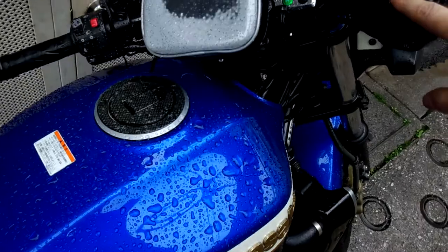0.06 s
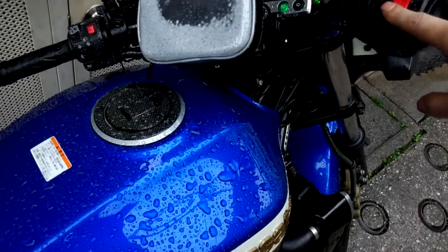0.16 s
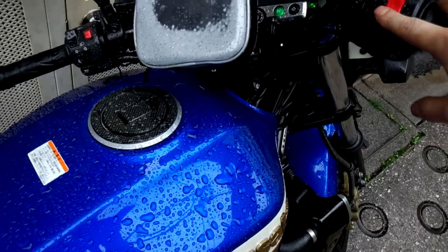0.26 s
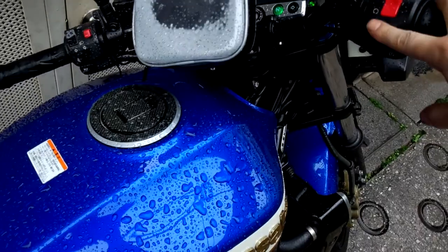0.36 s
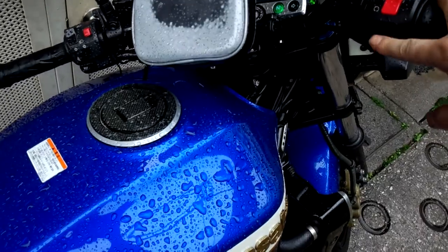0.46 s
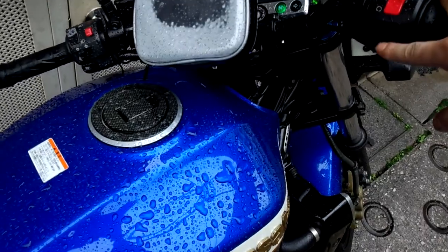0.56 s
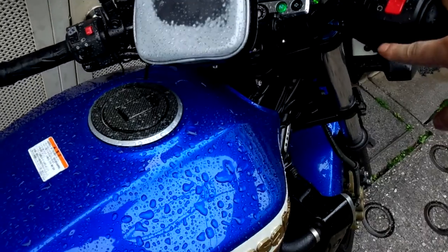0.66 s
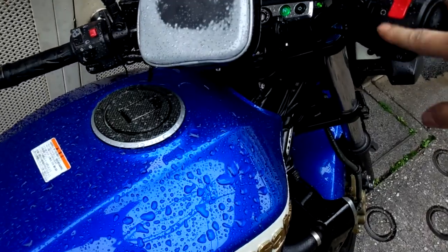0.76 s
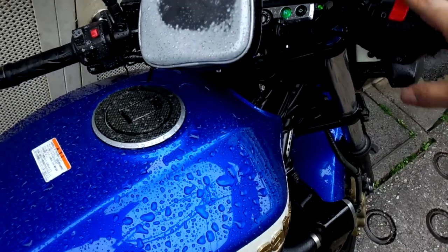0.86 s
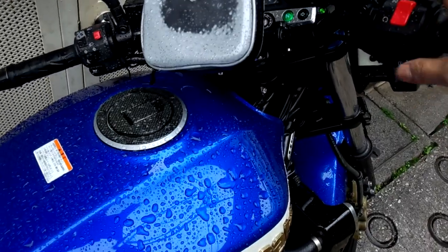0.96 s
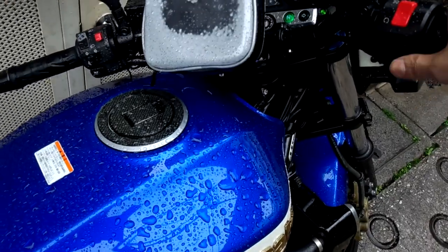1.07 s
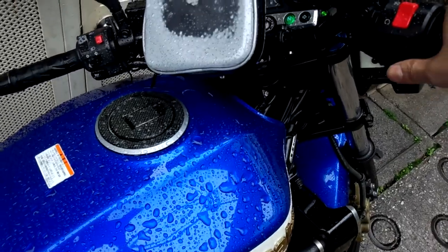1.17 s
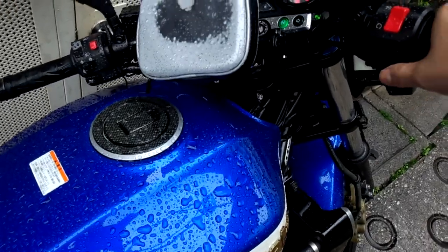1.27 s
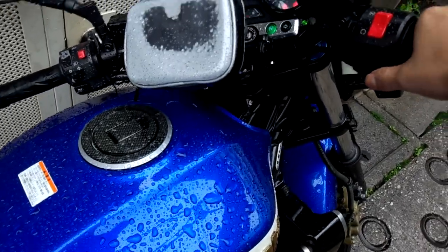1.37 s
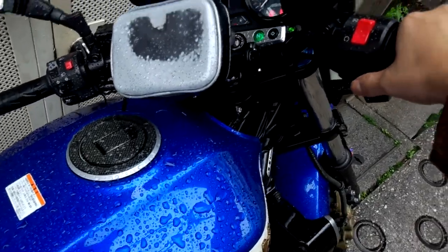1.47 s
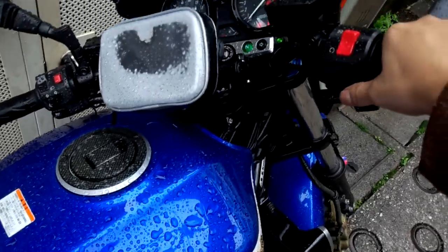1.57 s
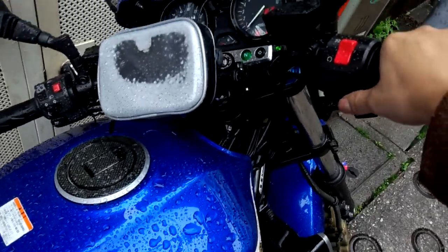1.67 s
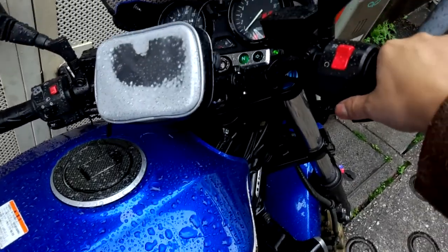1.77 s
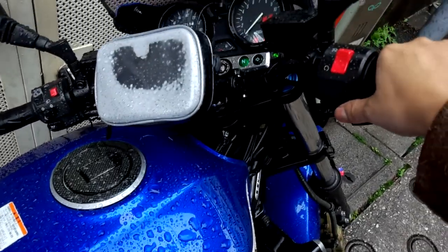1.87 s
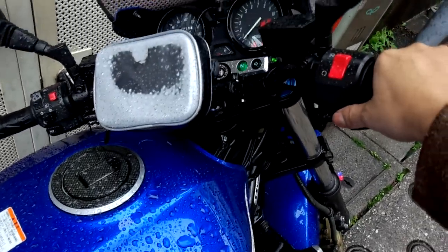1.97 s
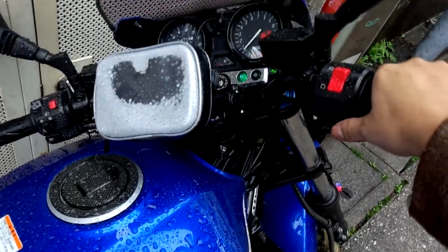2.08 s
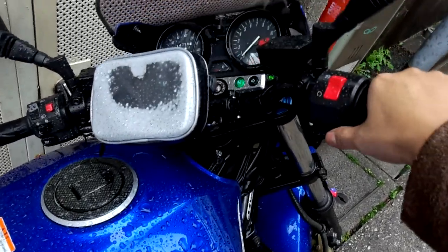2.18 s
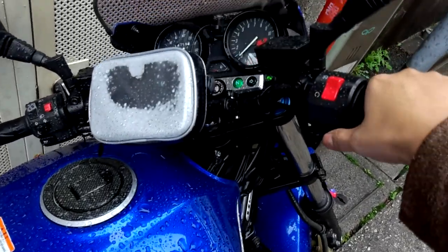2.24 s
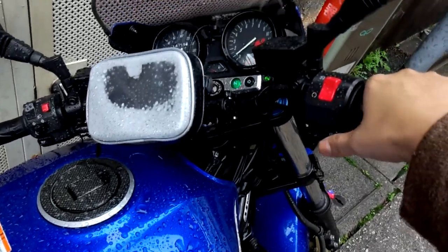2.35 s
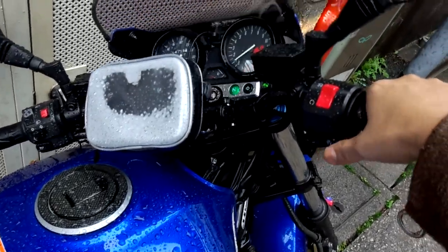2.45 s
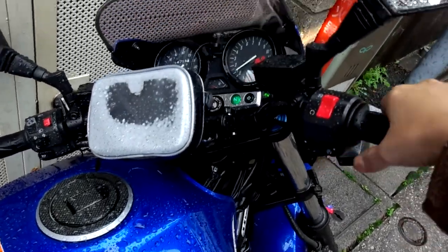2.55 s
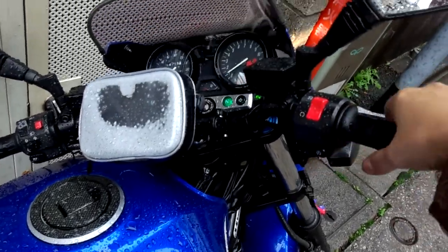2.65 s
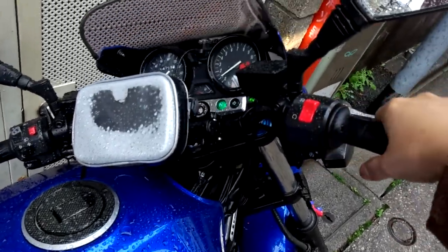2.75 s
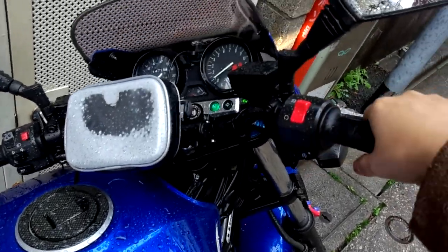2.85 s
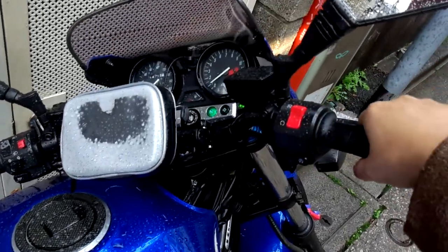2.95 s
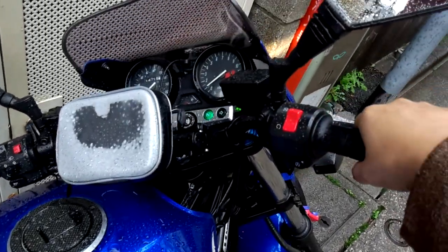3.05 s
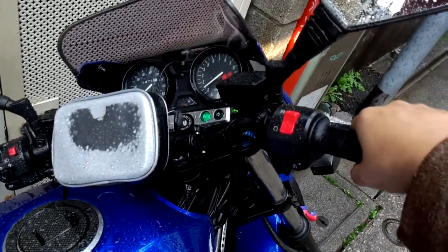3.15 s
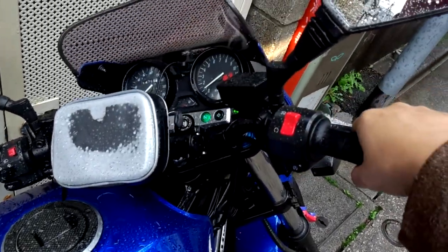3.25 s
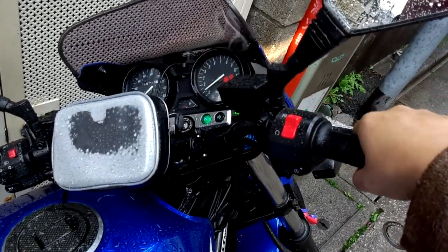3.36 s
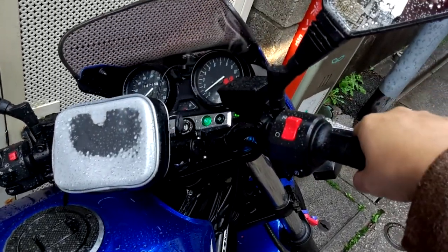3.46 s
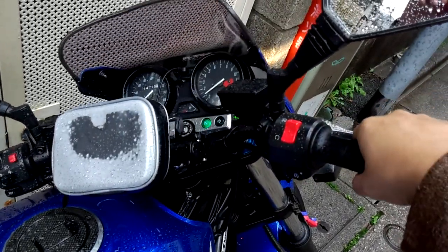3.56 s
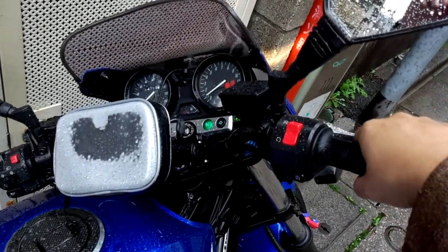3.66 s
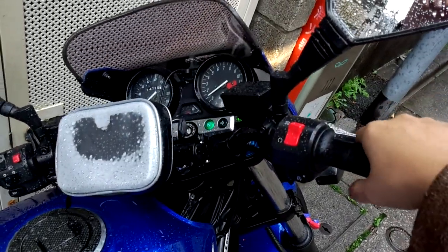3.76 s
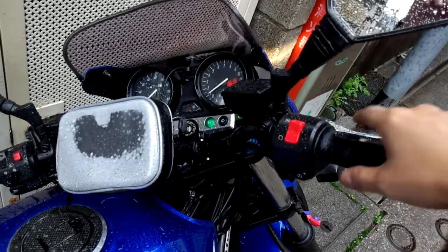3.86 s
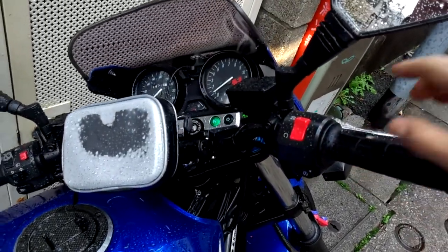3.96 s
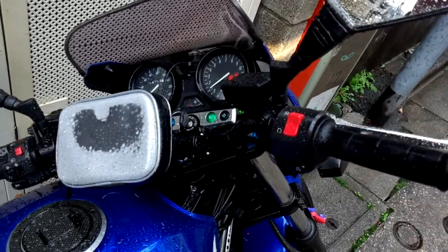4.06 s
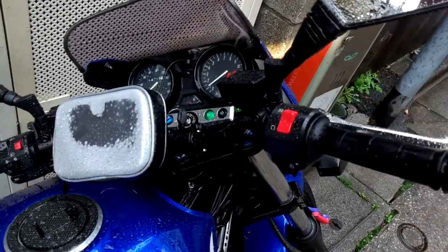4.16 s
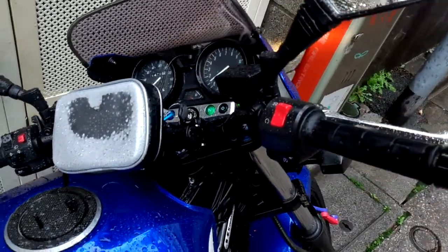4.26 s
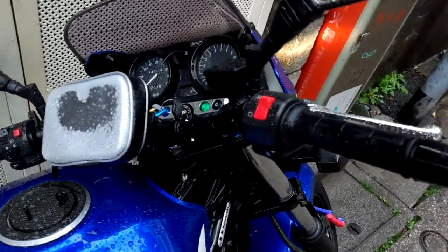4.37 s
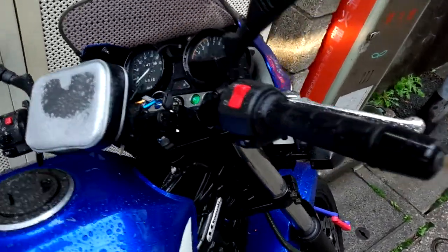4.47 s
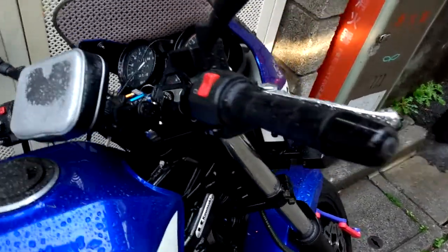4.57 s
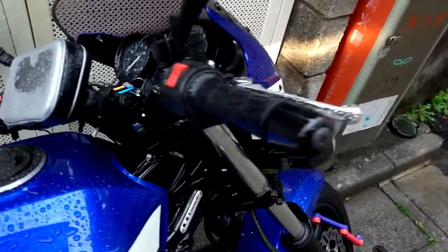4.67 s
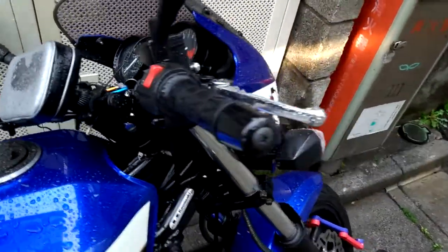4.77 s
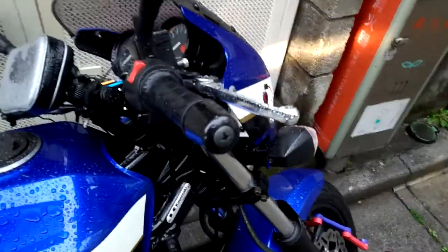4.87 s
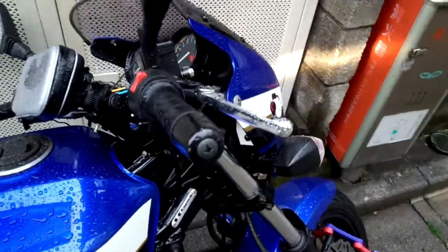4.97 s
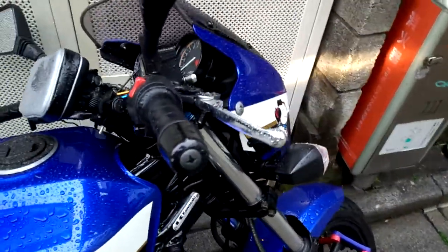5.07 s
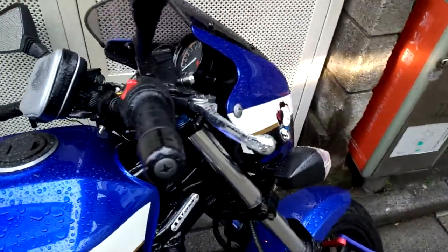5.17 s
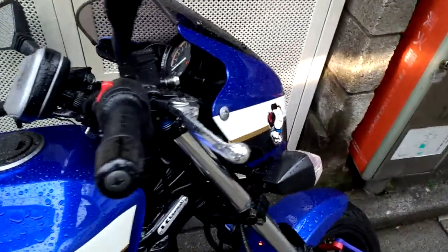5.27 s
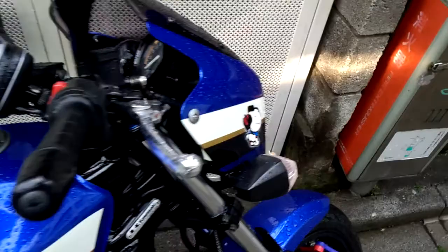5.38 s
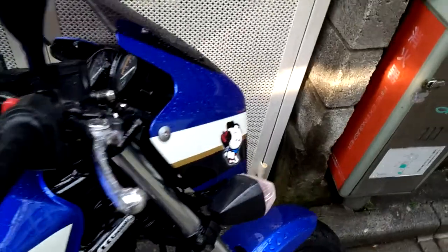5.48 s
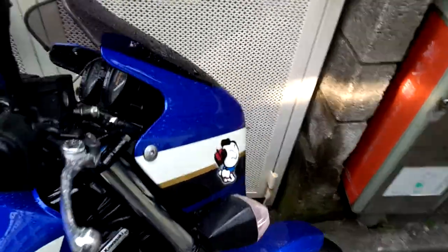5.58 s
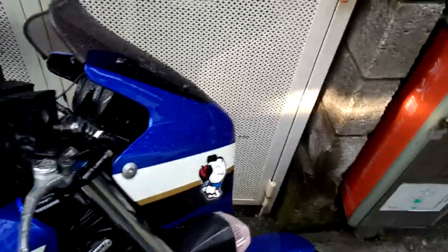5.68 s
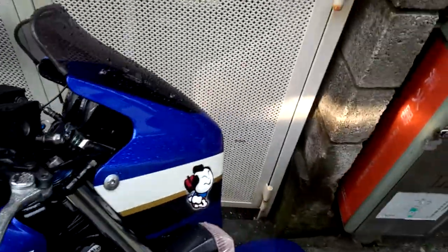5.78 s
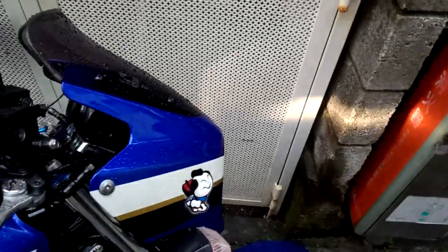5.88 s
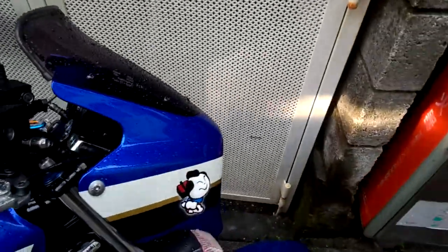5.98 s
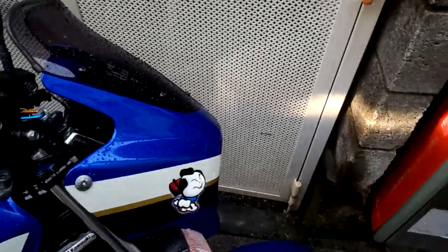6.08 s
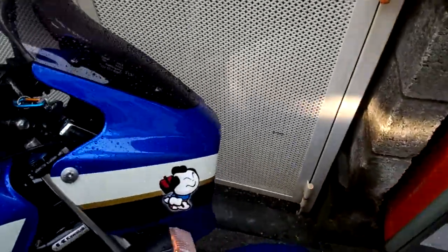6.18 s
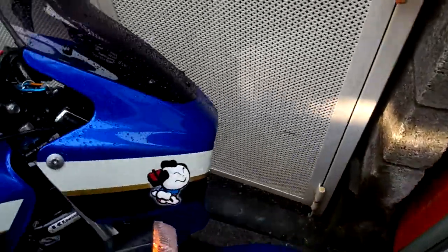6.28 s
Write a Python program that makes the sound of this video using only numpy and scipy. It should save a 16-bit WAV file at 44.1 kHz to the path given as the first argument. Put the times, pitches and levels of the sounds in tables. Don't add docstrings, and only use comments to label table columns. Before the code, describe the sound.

After sparse clicks and faint sleeve rustle, a cold motorcycle cranks with a short gritty squeal, fires, and settles into an uneven, throbbing close-up idle.

```python
import sys
import numpy as np
from scipy import signal
from scipy.fft import rfft, irfft
from scipy.io import wavfile
from scipy.ndimage import uniform_filter1d

SR = 44100
rng = np.random.default_rng(int(sys.argv[2]) if len(sys.argv) > 2 else 0)


def file_out(sig):
    cols = np.atleast_2d(sig).T
    lim = np.clip(cols, -1, 1)
    pcm = np.round(lim * 32767).astype(np.int16)
    wavfile.write(sys.argv[1], SR, pcm)


def elevation(decibels):
    levels = np.asarray(decibels, float)
    return 10 ** (levels / 20)


N = 279153
HEADROOM_DB = 9.5

# (frequency [Hz], level [dB per Hz])
YARD_COLOUR = [(12, -27), (20, 0), (70, 0.5), (148, -8), (185, -11), (219, -11.5), (274, -11.5), (519, -22),
               (667, -21.5), (1580, -31), (6720, -38), (10200, -40.5), (15500, -39.5)]
# (time [s], level [dB])
RUSTLE = [
    (0, -55),
    (.09, -57),
    (.105, -38.5),
    (.24, -50),
    (.36, -62),
    (.9, -63),
    (1.3, -58.5),
    (1.5, -58),
    (1.54, -75),
]
# (time [s], peak level [dB], centre [Hz], width [Hz], time to fall 60 dB [s])
CLICKS = [(0.088, -5, 6300, 2400, 0.017), (0.0888, -8, 4740, 1190, 0.025),
          (0.521, -35.5, 8000, 4000, 0.011), (.9575, -30, 9500, 4000, .006), (1.003, -40, 5000, 5000, .01),
          (1.0425, -38.5, 8440, 3000, .006), (1.067, -19.5, 8050, 9500, 0.0062),
          (1.082, -31, 5000, 4000, .005), (1.157, -31, 10500, 6000, .02), (1.167, -32, 10500, 6000, 0.031),
          (1.547, -15, 7100, 8900, 0.017), (0.0863, -19, 6000, 6000, 0.03), (0.0797, -25, 7500, 4000, .04),
          (5.474, -9.5, 5240, 6050, 0.003), (5.495, -28, 3700, 3000, 0.0074)]
# (frequency [Hz], level [dB], time to fall 60 dB [s])
SWITCH_HOUSING = [(1016, -4, 0.054), (1255, 4.5, 0.035), (2000, 4, 0.011), (4100, -10, 0.056),
                  (5950, -26, 0.03), (8300, -33, .02)]
# (time of peak [s], rise [s], level [dB], treble against it [dB])
GRIND = [
    (1.551, 0.0038, -26.5, -1),
    (1.615, 0.058, -22.5, 2),
    (1.664, .006, -23.5, 4),
    (1.747, 0.073, -29, -5.5),
    (1.814, 0.006, -28.5, 6),
    (1.907, 0.015, -30.5, 8.5),
]
# (frequency [Hz], width [Hz], level [dB])
CASING = [(1290, 120, 20), (1610, 76, -1), (2080, 49, 0), (3180, 29, -24.5), (3620, 42, -10),
          (4410, 53, -36)]
# (frequency [Hz], level [dB per Hz])
CASING_TREBLE = [(2350, -3.5), (4000, -7), (4640, -8.5), (8170, 4.5), (8700, 9.5), (9570, 0.5),
                 (10900, 5.5), (12400, -7), (15500, -54)]
# (start [s], length [s], first pitch [Hz], settled pitch [Hz], level [dB])
SQUEALS = [
    (1.559, 0.0183, 1280, 1257, -16),
    (1.658, .06, 1420, 1242, -16),
    (1.812, .027, 1437, 1250, -19),
    (1.901, .019, 1390, 1530, -21.5),
]
# (start [s], length [s], first pitch [Hz], settled pitch [Hz], level [dB])
CHIRPS = [(1.578, 0.0171, 1500, 1680, -21), (1.603, 0.03, 2050, 2230, -21),
          (1.829, 0.019, 2160, 2140, -29.5), (1.812, 0.018, 2160, 2170, -27), (1.6, 0.037, 1160, 1120, -27),
          (1.603, .03, 1640, 1620, -27), (1.583, 0.0121, 800, 530, -30), (1.733, 0.0302, 3800, 3760, -35),
          (1.963, .026, 3770, 3780, -38)]
# (multiple of its pitch [1], level [dB])
OVERTONES = [(1, 0), (3, -17), (5, -18), (7, -20)]
# (time [s], level [dB])
HEAVE = [
    (1.7, -48),
    (1.716, -50),
    (1.752, -32.5),
    (1.8, -37.5),
    (1.878, -42),
    (1.896, -44),
    (1.97, -10),
]
# (first firing [s], last firing [s], blow [dB], suck-back of the first miss [dB])
RUNS = [(1.986, 2.014, -1, 1), (2.088, 2.088, -6, -8), (2.206, 2.257, -3.5, 6), (2.301, 2.324, -1, -3),
        (2.391, 2.441, 2.5, -3), (2.583, 2.688, -3, 0.5), (2.821, 2.896, 0.5, 1), (3.03, 3.132, -1.5, -5.5),
        (3.177, 3.2, 5.5, -6), (3.267, 3.311, -0.5, -2.5), (3.47, 3.515, 2, -9), (3.674, 3.722, 1, -8),
        (3.875, 3.949, -1.5, 4), (4.09, 4.183, -1, 4), (4.285, 4.358, -3.5, -13), (4.462, 4.56, -6.5, 0),
        (4.734, 4.784, 0.5, -4), (4.894, 4.995, -1.5, -33.5), (5.111, 5.211, -4, -27),
        (5.321, 5.422, -5, 2.5), (5.566, 5.641, -2, 3), (5.751, 5.85, -3.5, -1), (5.984, 6.057, -1.5, 4),
        (6.202, 6.274, -3.5, -4)]
# (frequency [Hz], level [dB], time to fall 60 dB [s])
PIPE = [(34.32, 2.5, 0.2375), (78.8, -1.5, 0.41), (107.2, -0.5, 0.43), (154.3, -12, 0.19),
        (196.2, -20.5, 0.242), (229, -24.5, 0.076), (286.7, -23, 0.288)]
# (frequency [Hz], level [dB], time to fall 60 dB [s])
PIPE_FRONT = [(82.2, -5, .15), (161.7, -4, 0.15), (201.2, -12, 0.3)]
# (frequency [Hz], width [Hz], level [dB])
BURBLE = [(151.3, 33, -0.5), (187.55, 14, 2.5), (233.8, 26, 0.5), (266.1, 43.7, -1), (304, 19, -5),
          (406.3, 27.6, -13)]
# (frequency [Hz], level [dB per Hz])
ROAR = [(76, 2), (130, -4.5), (343, -4.5), (460, -19.5), (753, -38.5), (900, -31.5), (1170, -51),
        (1980, -120)]
# (time [s], level [dB], share heard from the front [0-1])
GEAR = [(1.94, -30.5, 0), (2.11, -33.5, 0), (2.16, -31, 0), (2.45, -34.5, 0.3), (3.0, -35, 0.18),
        (3.58, -36, 0.25), (4.24, -35, 0.26), (4.33, -32, 0.45), (4.42, -33.5, .5), (4.62, -35.5, 0.75),
        (5.0, -34.5, 0.7), (5.33, -34, 0.82), (5.45, -37.5, 0.81), (5.65, -34.5, 0.9), (5.9, -35.5, 0.92),
        (6.33, -35.5, 0.74)]
# (frequency [Hz], level [dB per Hz])
GEAR_ABOVE = [(260, 0.5), (450, -10.5), (539, -0.5), (865, -8.0), (1280, -2.5), (2740, -11.5), (3890, -7.5),
              (5430, -9.5), (7270, -8), (8830, -1), (9870, -14.5), (12500, -10.5), (16200, -44),
              (22000, -120)][:-2] + [(13500, -22), (16000, -34)]
# (frequency [Hz], level [dB per Hz])
GEAR_FRONT = [(260, -6.5), (450, -0.5), (753, -8.0), (941, -2.5), (2420, 1.0), (2710, -4.5), (3780, -6),
              (4340, -6.5), (7170, -12.0), (8590, 2.5), (10000, -12.0), (12500, -11.5), (16200, -44),
              (22000, -120)][:-2] + [(13500, -25), (16000, -48)]
# (frequency [Hz], width [Hz], level from above [dB], level from the front [dB])
COVERS = [(949, 23.4, -83, -7.5), (1885, 127, -41, -22), (2470, 105, -53, -17.5), (3700, 198, -19, -12),
          (3972.3, 41.6, -11.5, -27.5)]
# (frequency [Hz], level [dB], time to fall 60 dB [s])
TAPPETS = [(934, -5.5, 0.0143), (1113, -1.5, 0.0229), (1317, -1, 0.0231), (1540, -3.5, 0.034),
           (1890, -1, 0.0098), (2480, -7.5, 0.0043), (3000, -4.5, 0.0086), (3900, 2, 0.0072)]
# (time [s], level [dB])
KNOCKS = [(2.761, -23.5), (2.972, -26), (3.383, -22), (3.586, -21), (3.792, -22), (4.0, -22),
          (4.231, -21.5), (4.403, -22), (4.505, -33)]


def evened(x):
    return x / np.sqrt(np.mean(x ** 2) + 1e-20)


def add(mix, start_s, sound):
    part = mix[round(start_s * SR):][:len(sound)]
    part += sound[:len(part)]


def columns(rows):
    times, *cols = np.transpose(rows)
    t = np.arange(round(times[0] * SR), min(round(times[-1] * SR), N)) / SR
    return t, [np.interp(t, times, c) for c in cols]


def coloured(x, points):
    f, db = np.transpose(points)
    hz = np.fft.rfftfreq(len(x), 1 / SR)
    curve_db = np.interp(np.log(hz + 1), np.log(f + 1), db)
    return evened(irfft(rfft(x) * elevation(curve_db), len(x)))


def resonate(x, hz, width):
    r = np.exp(-np.pi * width / SR)
    return 2 * signal.lfilter([1 - r], [1, -r * np.exp(2j * np.pi * hz / SR)], x).real


def resonate_twice(x, hz, width):
    return resonate(resonate(x, hz, width), hz, width)


def ring(modes, length_s):
    t = np.arange(round(length_s * SR)) / SR
    return sum(elevation(db - 60 * t / t60) * np.sin(2 * np.pi * hz * t) for hz, db, t60 in modes)


def wobble(smooth_s):
    size = max(round(smooth_s * SR), 1)
    once = uniform_filter1d(rng.standard_normal(N), size)
    return evened(uniform_filter1d(once, size))


def yard():
    level_db = -38.5 + 1.0 * wobble(0.0077)
    out = elevation(level_db) * coloured(rng.standard_normal(N), YARD_COLOUR)
    t, (rustle_db,) = columns(RUSTLE)
    cloth = resonate(resonate(rng.standard_normal(len(t)), 6300, 7600), 6380, 7500)
    add(out, t[0], elevation(rustle_db + 5.0) * evened(cloth))
    return out


def clicks(housing_db=-10):
    out, t = np.zeros(N), np.arange(1500) / SR
    for start, db, hz, width, t60 in CLICKS:
        burst = rng.standard_normal(len(t)) * elevation(-60 * t / max(t60, .001))
        snap = resonate_twice(burst, hz, width)
        level_db = db + HEADROOM_DB * (start > 1.5)
        add(out, start, elevation(level_db) * snap / abs(snap).max())
    add(out, CLICKS[0][0], elevation(housing_db) * ring(SWITCH_HOUSING, .06) / 3)
    return out


def grinding(teeth):
    casing = evened(sum(elevation(.5 * db) * resonate(teeth, hz, 2 * width) for hz, width, db in CASING))
    body = evened(0.56 * evened(resonate(teeth, 2200, 3440)) + casing)
    body = signal.lfilter(*signal.butter(2, 210, "high", fs=SR), body)
    treble = coloured(teeth, CASING_TREBLE)
    t = np.arange(N) / SR
    engage_s, release_s, let_go_s = 1.546, 1.94, 0.068
    meshed = np.interp(t, [engage_s - .002, engage_s, release_s, release_s + let_go_s], [0, 1, 1, 0])
    level_db, treble_db = np.full(N, -36.0), np.full(N, -46.0)
    rise_db, ease_db_per_s, ease_treble_db_per_s = 11.5, 171, 356.5
    for peak, rise, db, bright_db in GRIND:
        before_db = rise_db * np.maximum(peak - t, 0) / rise
        after_s = np.maximum(t - peak, 0)
        level_db = np.maximum(level_db, db - before_db - ease_db_per_s * after_s)
        treble_db = np.maximum(treble_db, db + bright_db - before_db - ease_treble_db_per_s * after_s)
    return meshed * (1.05 * elevation(level_db) * body + elevation(treble_db) * treble)


def squeal(length, first_hz, settled_hz, db, slip):
    t = np.arange(round(length * SR)) / SR
    wait, settle = .25, .33
    slide = np.sin(np.pi / 2 * np.clip((t / length - wait) / settle, 0, 1)) ** 2
    hz = first_hz + (settled_hz - first_hz) * slide
    turns = np.cumsum(hz * (1 + 0.0062 * slip[:len(t)])) / SR
    seated = np.exp(-((hz - 1245) / 60) ** 2)
    tone = sum(elevation(o_db) * seated ** (k > 1) * np.sin(2 * np.pi * k * turns) for k, o_db in OVERTONES)
    bite_s, bite_db, wilt_db = .012, 16, 4.5
    shape_db = -bite_db * np.maximum(1 - t / bite_s, 0)
    shape_db -= wilt_db * (np.maximum(t - bite_s, 0) / (length - bite_s)) ** 4
    return np.sqrt(2) * elevation(db + shape_db) * tone * signal.windows.tukey(len(t), .15)


def starter():
    teeth = rng.standard_normal(N) * elevation(1.35 * wobble(0.0038))
    slip = wobble(0.0044)
    out = grinding(teeth)
    for start, length, first_hz, settled_hz, db in SQUEALS + CHIRPS:
        add(out, start, squeal(length, first_hz, settled_hz, db, slip[round(start * SR):]))
    t, (heave_db,) = columns(HEAVE)
    heave = evened(resonate(resonate(resonate(teeth, 46, 30), 45, 30), 46, 30))[:len(t)]
    add(out, t[0], elevation(heave_db) * heave * signal.windows.tukey(len(t), .3))
    return elevation(HEADROOM_DB - 0.5) * out


def strokes():
    push, afterburn, valves = np.zeros((3, N))
    stroke_s, coast_s, hesitate_s = .0255, .0245, .005
    burble_lead_s, burble_s = .055, .13
    half_burn, flooded, late_suck_db = 0.26, 7.3, -6.5
    next_starts = [run[0] for run in RUNS[1:]] + [N / SR + 0.077]
    for (first, last, blow_db, suck_db), after in zip(RUNS, next_starts):
        burble_db = -26
        if last < 4.4 and after - first > .125:
            burble_db = -7.5
        if first == RUNS[0][0]:
            burble_db = -2.5
        fired = np.linspace(first, last, round((last - first) / stroke_s) + 1)
        misses = max(round((after - last) / coast_s), 1)
        missed = np.linspace(last + hesitate_s, after, misses + 1)[1:-1]
        suck = np.full(len(missed), half_burn) - flooded * elevation(2 * burble_db) * np.arange(len(missed)) / 2
        suck[-2:] = -elevation(late_suck_db)
        suck[:1] = -elevation(suck_db)
        sag = 0.19 * np.sin(np.linspace(0, np.pi, len(fired)) ** 2 / np.pi)
        size = np.r_[elevation(blow_db) * (1 - sag), suck]
        size = size + 0.128 * rng.standard_normal(len(size))
        for s, a in zip(np.r_[fired, missed], size):
            add(push, s, np.array([a]))
            add(valves, s, np.ones(1))
        add(afterburn, last - burble_lead_s, elevation(burble_db) * np.hanning(round(burble_s * SR)))
    return push, afterburn, valves


def pipe_ring(modes, phase):
    t = np.arange(-SR // 25, SR // 4) / SR
    swell = np.exp(-(np.minimum(t, 0) / 0.014) ** 2)
    tail = np.maximum(t, 0)
    return swell * sum(elevation(db - 60 * tail / t60) * np.cos(2 * np.pi * hz * t + phase) for hz, db, t60 in modes)


def exhaust(push, afterburn):
    blow, near = pipe_ring(PIPE, 0.65), pipe_ring(PIPE_FRONT, -0.94)
    t = np.arange(N) / SR
    s, _, front = np.transpose(GEAR)
    front = np.interp(t, s, front) ** 2
    blows = signal.oaconvolve(push, blow / blow.max())[SR // 25:][:N]
    blows += signal.oaconvolve(np.maximum(push, 0) * front, near / blow.max())[SR // 25:][:N]
    catch_t = np.arange(round(.075 * SR)) / SR
    song = np.hanning(len(catch_t)) * np.sin(2 * np.pi * 104 * catch_t + 3.4)
    add(blows, 2.035, elevation(-5.5) * song)
    choke = 1.59
    blows = choke * np.tanh(blows / choke)
    gas = rng.standard_normal(N)
    burble = evened(sum(elevation(db) * resonate_twice(gas, hz, width) for hz, width, db in BURBLE))
    running = np.interp(t, [1.93, 1.99], [0, 1]) * elevation(-7 * front)
    roar = elevation(-26) * running * coloured(rng.standard_normal(N), ROAR)
    return elevation(0.5) * (blows + elevation(-12) * (afterburn + 0.15 * running) * burble) + roar


def valve_gear(valves):
    t, (level_db, front) = columns(GEAR)
    at = slice(round(t[0] * SR), round(t[0] * SR) + len(t))
    lope_s, lope_lead_s, coast_lag_s = 0.03, 0.002, 0.016
    lope = sum(np.exp(-((t - run[0] + lope_lead_s) / lope_s) ** 2) for run in RUNS)
    coast = sum(np.exp(-((t - run[1] - coast_lag_s) / lope_s) ** 2) for run in RUNS)
    level_db = level_db + (0.5 + front * (3.5 - 0.5)) * lope + 1.5 * (1 - front) * coast
    puffs = 1 + 0.0574 * signal.oaconvolve(valves, np.hanning(round(0.019 * SR)))[:N]
    air = rng.standard_normal(N) * puffs * elevation(1.0 * wobble(0.0068))
    ticks = np.zeros(N)
    for mode in TAPPETS:
        strength_db = 4.0 * np.minimum(rng.exponential(1, N), 3)
        hits = np.roll(valves, rng.integers(0, 800)) * elevation(strength_db)
        ticks += signal.oaconvolve(hits, ring([mode], .05))[:N]
    ticks = evened(ticks)
    knock = ring(TAPPETS, .05)
    for s, db in KNOCKS:
        add(ticks, s, elevation(db + 37) * knock)
        add(ticks, s - .052, elevation(db + 37 - 3) * knock)
        level_db = level_db - 3.5 * (t > s + .008) * np.exp(-np.maximum(t - s, 0) / 0.049)
    hiss = (1 - front) * coloured(air, GEAR_ABOVE)[at] + front * coloured(air, GEAR_FRONT)[at]
    for hz, width, above_db, front_db in COVERS:
        cover = elevation(2.5 * wobble(0.048)) * evened(resonate(air, hz, width))
        hiss += elevation(above_db + front * (front_db - above_db)) * cover[at]
    out = np.zeros(N)
    fade_in = np.minimum((t - t[0]) / 0.027, 1)
    add(out, t[0], elevation(level_db + HEADROOM_DB) * fade_in * (hiss + elevation(-11) * ticks[at]))
    return out


def scene():
    push, afterburn, valves = strokes()
    return (yard() + clicks() + starter() + exhaust(push, afterburn) + valve_gear(valves))[None]


def low_pass(x):
    return signal.sosfilt(signal.butter(12, 16480, fs=SR, output="sos"), x)


def record(dry):
    ceiling_db, grip, recover_db_per_s, attack_s = -17, 0.66, 75, 0.00077
    peak_db = 20 * np.log10(abs(dry[0]) + 1e-9)
    fall = np.arange(N) * recover_db_per_s / SR
    held_db = np.maximum.accumulate(peak_db + fall) - fall
    over_db = np.maximum(held_db - ceiling_db, 0)
    r = np.exp(-1 / (attack_s * SR))
    gain = elevation(-grip * signal.lfilter([1 - r], [1, -r], over_db))
    thump = signal.lfilter(*signal.butter(2, 2.2, "high", fs=SR), 0.17 * (1 - gain))
    edge = signal.firwin(301, 15800, window=("kaiser", 9), fs=SR)
    mix = signal.oaconvolve(dry * gain + thump, edge[None], "same")
    return low_pass(mix)


dry = scene()
out = record(dry)
file_out(out)
```